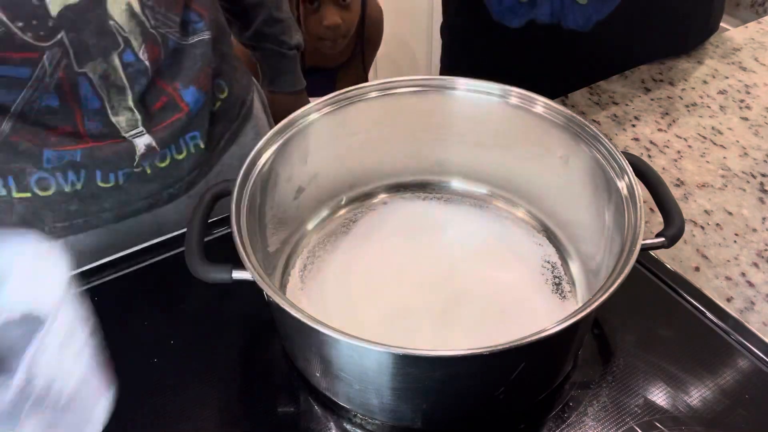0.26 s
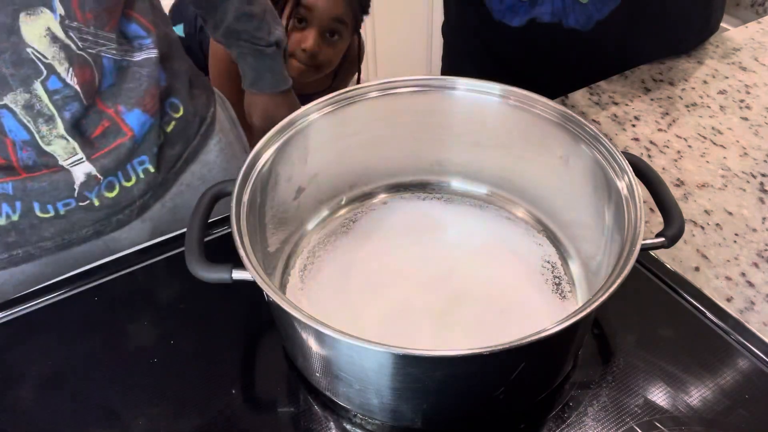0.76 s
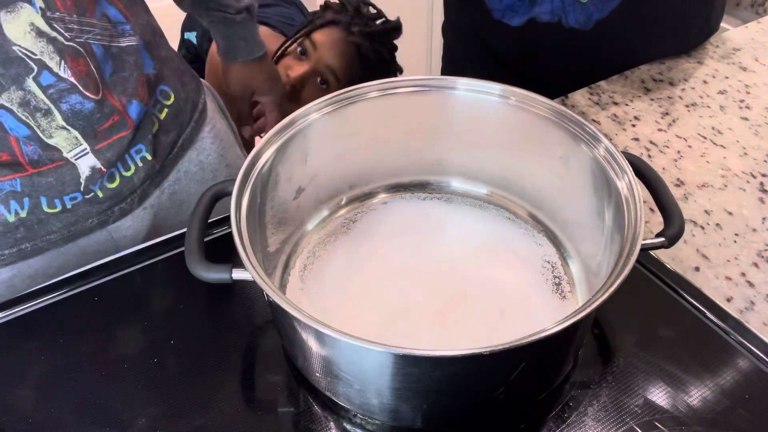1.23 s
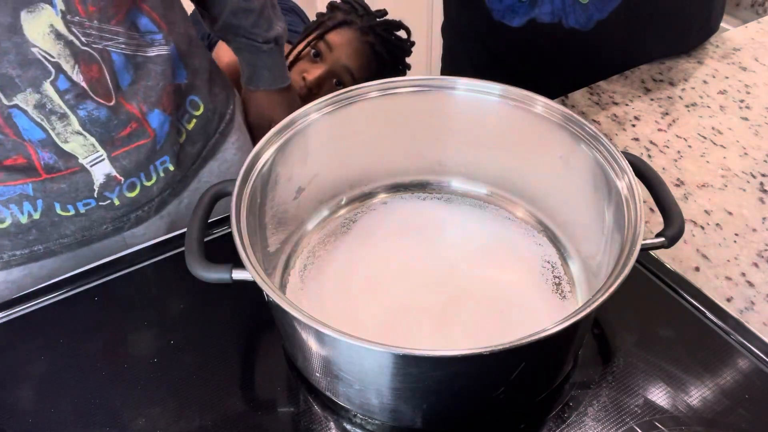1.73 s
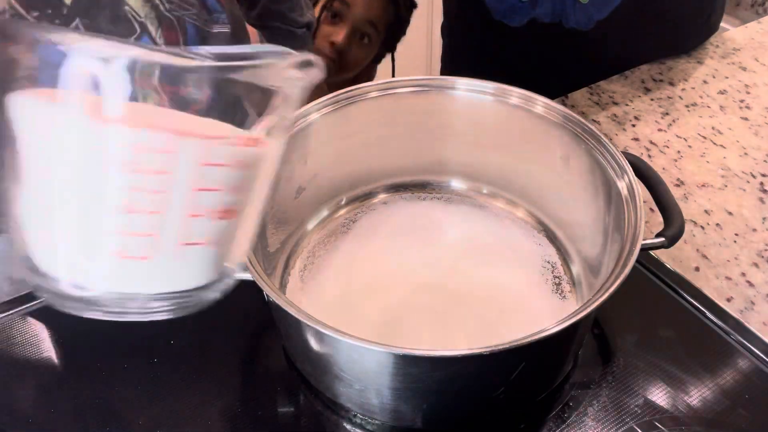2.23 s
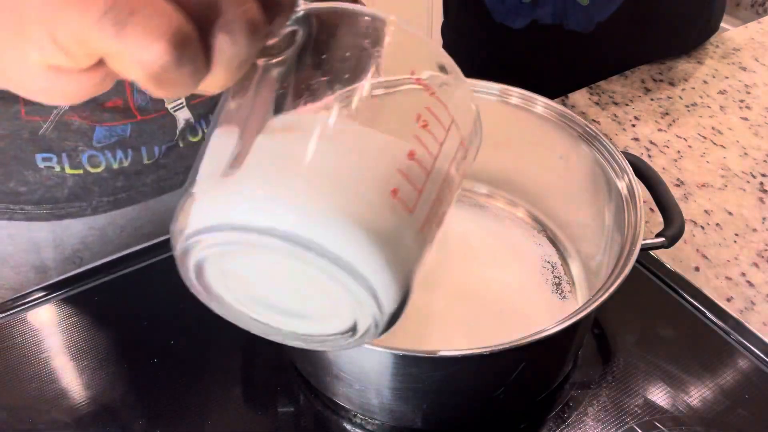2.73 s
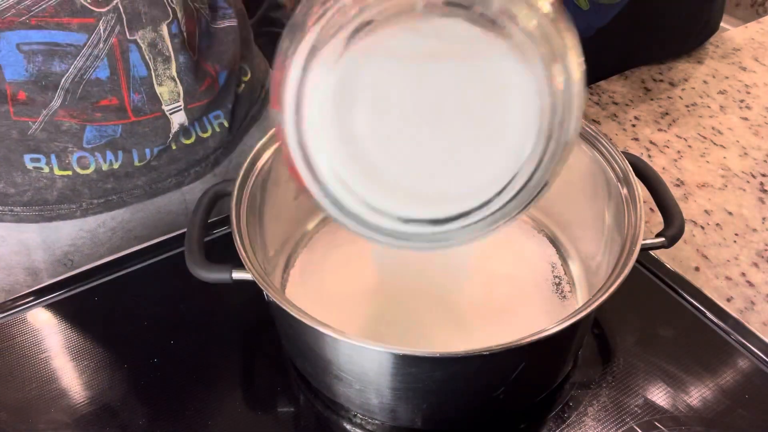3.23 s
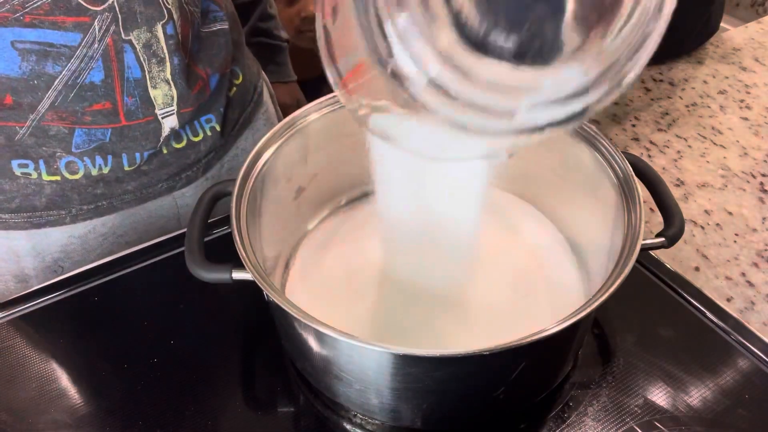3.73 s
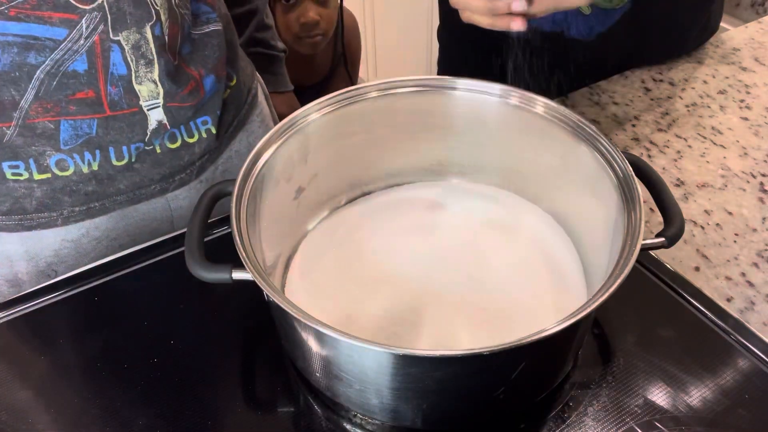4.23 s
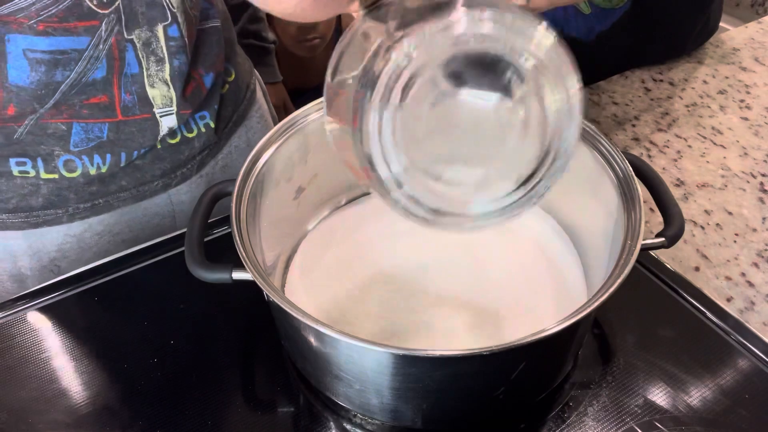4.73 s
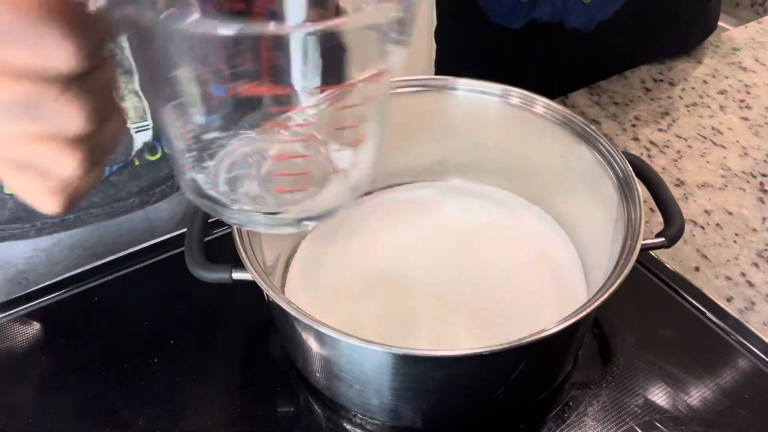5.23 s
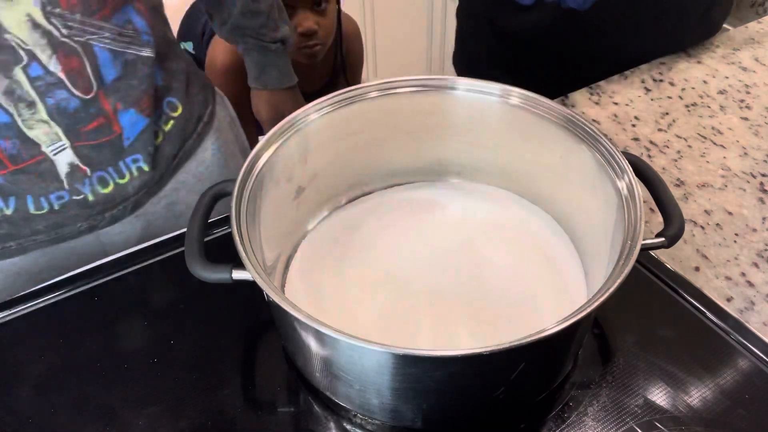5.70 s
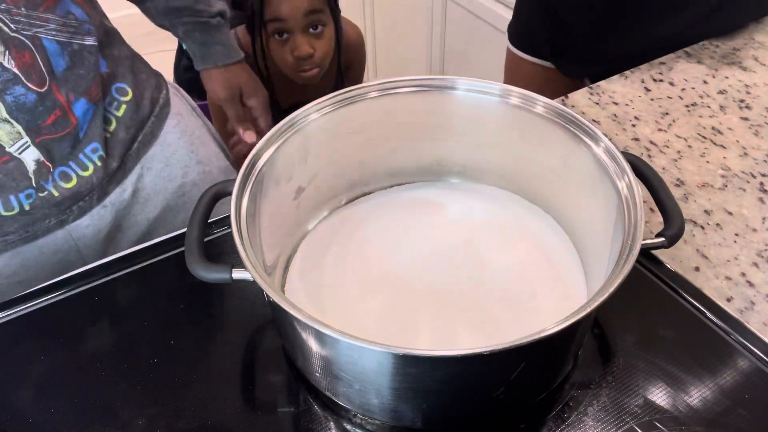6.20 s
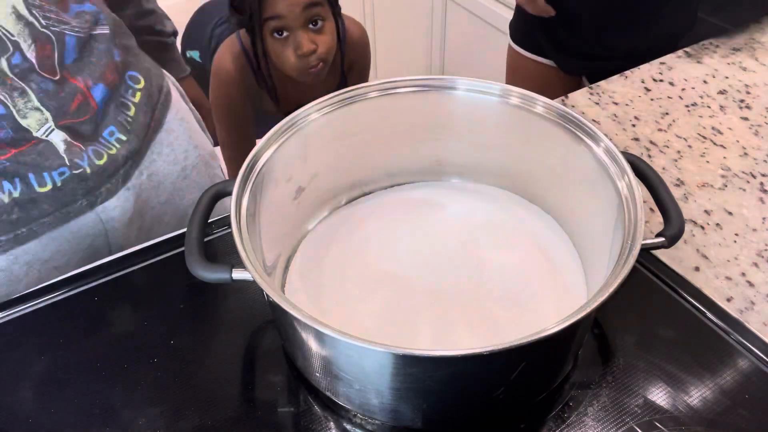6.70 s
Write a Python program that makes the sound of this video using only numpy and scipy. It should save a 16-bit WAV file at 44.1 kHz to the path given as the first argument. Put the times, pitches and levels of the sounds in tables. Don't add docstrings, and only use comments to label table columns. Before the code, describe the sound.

A plastic cup clacks down, sugar pours in a fine faint hiss, and finally a heavy glass jug clanks hard on a stone counter above fan hum.

```python
import sys
import numpy as np
from scipy import signal
from scipy.fft import rfft, irfft, next_fast_len
from scipy.io import wavfile
from scipy.ndimage import uniform_filter1d, minimum_filter1d

SR = 44100
rng = np.random.default_rng(int(sys.argv[2]) if len(sys.argv) > 2 else 0)


def master(y):
    cut = np.clip(np.atleast_2d(y).T, -1, 1)
    pcm = np.round(cut * 32767)
    wavfile.write(sys.argv[1], SR, pcm.astype(np.int16))


def convert_level_to_amplitude(level_db):
    exponent = np.asarray(level_db, float) / 20
    return 10 ** exponent


N = 306936
T = np.arange(N) / SR
HZ = np.fft.rfftfreq(N, 1 / SR) + 1e-3

# start in seconds, peak in dB, hardness in dB, counter thud in dB.
KNOCKS = [
    (6.279, -17, -33, -16.5),
    (6.2853, -13.5, -14, 5),
    (6.318, -32, -10, -26),
    (6.325, -10.5, -3, 2),
    (6.487, -26.5, -7, -30),
    (6.492, -16, -0.5, -4.5),
    (6.517, -22, 12.5, 5.5),
    (6.63, -35.5, -10, 0),
]
# frequency in Hz, lead of the left port in radians.
GLASS_MODES = [(3497, 0), (3507, .5), (3795, -.3), (4537, 2.6), (4547, 2.6), (5717, 1.5), (6745, 0),
               (8021, 0), (9238, 0), (9868, 0), (9930, 0), (10300, 0), (10420, 0), (10670, 0), (11720, 0),
               (11800, 0), (12020, 0), (12150, 0), (13420, 0), (14050, 0), (14590, 0)]
# level in the first knocks in dB, level in the last in dB, decay T60 in seconds.
GLASS_RING = [(-45, -37, 0.54), (-55, -47, 0.62), (-59, -41, 0.41), (-59, -29, 0.29), (-48, -41.5, 0.63),
              (-63, -59, 0.32), (-62, -47, .2), (-63, -52.5, 0.36), (-55, -66, 0.089), (-46.5, -41.5, 0.25),
              (-45, -62, 0.17), (-38.5, -46, 0.092), (-67, -62.5, .3), (-67, -60, 0.065),
              (-41, -44.5, 0.11), (-57, -61.5, 0.42), (-45, -52.5, 0.13), (-64, -62.5, 0.34),
              (-53, -62, 0.17), (-68, -57, 0.104), (-72, -57, .09)]


def rms_one(x):
    return x / np.sqrt(np.mean(x ** 2) + 1e-20)


def in_time(rows):
    s, *columns = np.transpose(rows)
    return [np.interp(T, s, c) for c in columns]


def in_pitch(rows):
    hz, *columns = np.transpose(rows)
    return [np.interp(np.log(HZ), np.log(hz), c) for c in columns]


def drift(rate):
    r = np.exp(-80 * np.pi * rate / SR)
    noise = rng.standard_normal(N // 40 + 2002)
    slow = signal.lfilter([1], [1, -2 * r, r * r], noise)[2000:]
    return np.interp(np.arange(N) / 40, np.arange(len(slow)), rms_one(slow))


def colour(x, gain):
    return irfft(rfft(x) * gain, N)


def ring(clicks, hz, t60):
    r, w = convert_level_to_amplitude(-60 / (t60 * SR)), 2 * np.pi * hz / SR
    return signal.lfilter([0, np.sin(w)], [1, -2 * r * np.cos(w), r * r], clicks + 1e-18)


def fading(times, gains, t60, rise_s):
    clicks = np.zeros(N)
    clicks[(np.asarray(times) * SR).astype(int)] = gains
    r, q = convert_level_to_amplitude(-60 / (t60 * SR)), np.exp(-1 / (rise_s * SR))
    return signal.lfilter([1 - q], np.convolve([1, -r], [1, -q]), clicks + 1e-18)


def at_ports(gain, alike, lead, tilt_db):
    shared, left, right = rfft(rng.standard_normal((3, N))) * gain
    alike = np.clip(alike, 0, 1)
    common, own = np.sqrt(alike) * shared, np.sqrt(1 - alike)
    left = (common + own * left) * convert_level_to_amplitude(tilt_db / 2)
    right = (common * np.exp(1j * lead) + own * right) * convert_level_to_amplitude(-tilt_db / 2)
    return rms_one(irfft(np.array([left, right]), N))


def apart(modes, lag_s):
    return np.minimum(2 * np.pi * lag_s * np.array(modes)[:, 0], 3.0)


def struck(times, levels_db, modes, leads, spread_db, rise_s, pan_db):
    out, first = np.zeros((2, N)), int(times[0] * SR) - 100
    length = min(SR, N - first)
    at = (np.asarray(times) * SR).astype(int) - first
    chance = rng.standard_normal((len(times), len(modes)))
    levels_db = np.broadcast_to(levels_db.reshape(len(times), -1), chance.shape)
    q = np.exp(-1 / (rise_s * SR))
    for k, ((hz, level_db, t60), lead) in enumerate(zip(modes, leads)):
        clicks, spin = np.zeros(length, complex), np.exp(2j * np.pi * hz / SR)
        clicks[at] = convert_level_to_amplitude(levels_db[:, k] + level_db + spread_db * chance[:, k]) * (-1) ** k
        poles = np.convolve([1, -convert_level_to_amplitude(-60 / (t60 * SR)) * spin], [1, -q * spin])
        swing = signal.lfilter([1 - q], poles, clicks + 1e-18)
        out[:, first:first + length] += np.imag(swing * [[convert_level_to_amplitude(pan_db)], [np.exp(-1j * lead)]])
    return out


def crack(times, levels_db, bright_db, spectrum, t60, rise_s, lag_s, alike, pan_db, high_share=0.29):
    gain = convert_level_to_amplitude(in_pitch(spectrum)[0]) / (1 + (70 / HZ) ** 4)
    bright = np.clip((HZ - 3800) / 2500, 0, 1)
    likeness = alike + (1 - alike) / (1 + (HZ / 300) ** 2)
    noise = at_ports(gain, likeness, -2 * np.pi * HZ * lag_s, pan_db)
    highs = colour(noise, bright)
    lows = (noise - highs) * fading(times, convert_level_to_amplitude(levels_db), t60, rise_s)
    return lows + highs * fading(times, convert_level_to_amplitude(levels_db + bright_db), t60 * high_share, rise_s * 0.31)


def jug():
    # drive of the low glass modes, of the high ones and of the steel trivet, all in dB.
    drive = [
        (-24, -44, -40),
        (-25, -2, -9),
        (-32, -30, -42),
        (0, 0.5, -12),
        (-30, -22, -24),
        (-3, 2.5, -3),
        (2.5, -3.5, -19),
        (-21, -26, -16),
    ]
    # frequency in Hz, level in dB, decay T60 in seconds.
    trivet_modes = [(753, -25, 0.3), (878, -38, 0.38), (1200, -33, .3), (1405, -28.5, 0.63),
                    (1860, -33, .3), (2120, -26, 0.29), (2640, -45, .4), (2930, -46, .4)]
    # frequency in Hz, level in dB, decay T60 in seconds.
    counter_modes = [(102, -15.5, 0.15), (147, -8.5, 0.12), (229, -7.5, 0.02), (396, -1, 0.027),
                     (670, -8.5, 0.02), (720, -2, 0.048), (786, -2.5, 0.055), (915, -14, 0.071),
                     (1060, -2, 0.053), (1196, -6.5, 0.061), (1355, -3, 0.052), (1448, -4.5, 0.11),
                     (1520, -21, 0.1), (1900, -9, 0.051), (1935, -1, 0.065), (2270, -10.5, 0.1),
                     (2540, -3, 0.022), (3230, -8.5, 0.032), (3564, -11.5, 0.04), (4450, -13, 0.043)]
    # frequency in Hz, density in dB per Hz.
    contact_spectrum = [(35, -50), (60, -17), (160, -4.5), (566, -12), (732, 0.5), (862, -4), (3580, -12.5),
                        (6140, -28.5), (6700, -23), (7230, -84), (10000, -27), (13900, -74), (16000, -63)]
    # frequency in Hz, density in dB per Hz.
    rattle_spectrum = [(60, -27), (160, -10), (566, -9.5), (732, -0.5), (900, -5), (3580, -12.5),
                       (5000, -30), (6800, -29.5), (7100, -70), (16000, -83)]
    s, peak_db, hard_db, thud_db = np.transpose(KNOCKS)
    low_db, high_db, steel_db = np.transpose(drive)
    hz, leads = np.transpose(GLASS_MODES)
    first_db, last_db, t60 = np.transpose(GLASS_RING)
    blows_db = np.where(s[:, None] < 6.4, first_db, last_db)
    blows_db = blows_db + np.where(hz < 7500, low_db[:, None], high_db[:, None])
    glass = struck(s, blows_db, np.transpose([hz, 0 * hz, t60]), leads, spread_db=1.0, rise_s=0.0019, pan_db=3.0)
    glass *= convert_level_to_amplitude(1.9 * np.sin(2 * np.pi * 23 * T))
    trivet = struck(s, steel_db, trivet_modes, apart(trivet_modes, 0.00032),
                    spread_db=1.0, rise_s=0.0026, pan_db=4.0)
    trivet = trivet * convert_level_to_amplitude(2.2 * drift(19))
    counter = struck(s, peak_db + thud_db - 6.5, counter_modes, apart(counter_modes, 0.00044),
                     spread_db=3.0, rise_s=0.00099, pan_db=7.5)
    contact = crack(s, peak_db, hard_db - 3, contact_spectrum, 0.071,
                    rise_s=0.0018, lag_s=0.00037, alike=0.27, pan_db=-3.0)
    rattle = crack(s, peak_db - 25.5, -2.5, rattle_spectrum, 0.79,
                   rise_s=0.0022, lag_s=0.000526, alike=0.21, pan_db=-1.5, high_share=0.79)
    patchy = convert_level_to_amplitude(2.0 * drift(26))
    return glass + trivet + counter + contact + rattle * patchy


def sugar():
    # frequency in Hz, density in dB per Hz.
    grain_spectrum = [(2500, -30), (4000, -12), (6400, -5.5), (7100, 0.5), (8000, 1.5), (9300, -9.5),
                      (10400, -3), (12000, -6.5), (14600, -5), (15600, -2)]
    # time in seconds, hiss in dB.
    flow = [
        (2.72, -104),
        (2.8, -89),
        (3.3, -82.5),
        (3.42, -79),
        (3.61, -76.5),
        (3.95, -80.5),
        (4.1, -80),
        (4.26, -88),
        (4.33, -104),
    ]
    # peak time in seconds, peak in dB, swell and fade in seconds, over 30 dB.
    rustles = [(.05, -90.5, 0.35, .9), (.40, -72, 0.19, 0.65), (.52, -77.5, 0.37, 0.61),
               (.72, -84, 0.37, 0.44), (2.55, -93, .6, .7), (4.5, -97, .5, 2.5), (5.4, -91, .6, 0.71),
               (5.55, -83, .7, 0.54), (5.87, -74.5, 0.15, 0.24), (6.1, -75.5, .45, 0.62),
               (6.45, -86, 0.4, .9), (6.78, -80.5, 0.8, 0.63)]
    sizes = convert_level_to_amplitude(3.0 * np.minimum(rng.exponential(1, N), 5)) * rng.choice([-1, 1], N)
    grains_per_s = 9000 * convert_level_to_amplitude(1.2 * drift(15))
    grains = sizes * (rng.random(N) < grains_per_s / SR)
    hiss = rms_one(colour(grains, convert_level_to_amplitude(in_pitch(grain_spectrum)[0])))
    high_modes = zip(GLASS_MODES[9:18], GLASS_RING[9:18])
    glass = rms_one(sum(convert_level_to_amplitude(db) * ring(grains, hz, t60=0.1) for (hz, _), (_, db, _) in high_modes))
    flow_db, = in_time(flow)
    lip = convert_level_to_amplitude(flow_db - 14 + 1.1 * (flow_db - flow_db.max())) * glass
    cloth = sum(convert_level_to_amplitude(db - 29.4 * np.maximum((s - T) / swell, (T - s) / fade)) ** 2
                for s, db, swell, fade in rustles)
    level = np.sqrt(convert_level_to_amplitude(flow_db) ** 2 + cloth)
    top = colour(hiss, np.clip((HZ - 12970) / 1200, 0, 1))
    hiss = hiss - top / (1 + (level / convert_level_to_amplitude(-93)) ** 2)
    return convert_level_to_amplitude(8.0 + ducking_db()) * (level * hiss + lip) * np.ones((2, 1))


def cup():
    # start in seconds, peak in dB, thump in dB, brightness in dB.
    bounces = [
        (0.541, -38, -33, -17.5),
        (0.5495, -16, -1, 9),
        (0.563, -26.5, -2, -5),
        (0.622, -29.5, -5, 2.5),
        (0.68, -27, -3, -1),
    ]
    # frequency in Hz, level in dB, decay T60 in seconds.
    plastic_modes = [(168.8, 1, 0.16), (297, -6.5, 0.12), (731, -8, 0.18), (842.5, -5.5, .1),
                     (922, -5, 0.2), (1101, -9, 0.093), (1610, -9.5, 0.144), (1860, -19.5, 0.105),
                     (2360, -20, 0.14), (3230, -17.5, 0.14), (3290, -27.5, 0.4), (3400, -7.5, .065),
                     (4670, -29, 0.065), (6000, -22, 0.049)]
    # frequency in Hz, density in dB per Hz.
    contact_spectrum = [(59, -35), (100, -10), (266, -4.5), (492, -7.5), (910, -1.5), (1870, -16.5),
                        (5770, -27.5), (6990, -26), (11900, -34.5), (16000, -43.5)]
    s, peak_db, thump_db, bright_db = np.transpose(bounces)
    thump = struck(s, peak_db + thump_db - 9.5, plastic_modes[:2], [.2, .4],
                   spread_db=4.5, rise_s=0.0005, pan_db=1.5)
    wall_modes = plastic_modes[2:]
    wall_db = peak_db - 14.0 - 4.5 * (s > .6)
    wall = struck(s, wall_db, wall_modes, apart(wall_modes, .00005), spread_db=5.5, rise_s=.0007, pan_db=1.2)
    contact = crack(s, peak_db - 5.5, bright_db + 6.5, contact_spectrum, 0.047,
                    rise_s=0.00097, lag_s=0, alike=0.38, pan_db=4.0)
    rattle = crack(s, peak_db - 28.0, bright_db + 5.0, contact_spectrum, 0.48,
                   rise_s=0.003, lag_s=0, alike=0.9, pan_db=2.0)
    return thump + wall + contact + rattle


def ticks():
    # start in seconds, level in dB, body frequency in Hz.
    snaps = [(.045, -74, 8400), (1.131, -68, 8040), (1.22, -74, 9020), (1.24, -77, 11000),
             (1.36, -80, 11000), (1.40, -77, 11100), (1.664, -68, 11530), (1.976, -70.5, 14020),
             (2.188, -67.5, 7000), (2.21, -73.5, 11000), (2.24, -79, 11000), (4.27, -67.5, 9920),
             (5.06, -69.5, 12040), (5.47, -67.5, 11600), (5.911, -66, 14800), (6.23, -62, 11320)]
    # start in seconds, body in dB, body frequency in Hz,
    taps = [(.171, -70, 4530, -21), (.321, -55, 5870, -7), (.6215, -39.5, 1490, -33),
            (.623, -49, 1930, -29), (0.683, -38, 1880, -30), (1.5808, -51.5, 2930, -23),
            (1.583, -54, 7030, -13), (1.581, -59, 4900, -11), (2.088, -44.5, 2740, -21.5),
            (2.089, -49.5, 1820, -22), (2.12, -51.5, 1280, -23), (2.13, -54, 2720, -6),
            (4.043, -58.5, 3060, -15.5), (4.704, -47.5, 1440, -39.5), (4.711, -48, 2260, -50),
            (5.79, -58, 5450, 5.5), (5.805, -42, 2950, -6.5), (5.807, -47.5, 6960, -29),
            (5.848, -51.5, 4700, -6.5), (6.456, -46, 2980, -30.5), (6.79, -55, 4770, -2.5),
            (6.952, -65, 4600, -8)]
    rows = [(s, db, hz, db - 1, 0.05) for s, db, hz in snaps]
    rows += [(s, db + snap_db, hz, db, 0.057) for s, db, hz, snap_db in taps]
    rows = sorted(rows)
    out, noise = np.zeros((2, N)), rng.standard_normal((len(rows), 2, 2, 8000))
    snap = signal.butter(2, [4500, 14500], "band", fs=SR, output="sos")
    for (s, bright_db, hz, body_db, t60), puff in zip(rows, noise):
        body = signal.butter(1, hz * np.array([.9, 1.11]), "band", fs=SR, output="sos")
        sound = convert_level_to_amplitude(bright_db) * rms_one(signal.sosfilt(snap, puff[0]))
        sound += convert_level_to_amplitude(body_db) * rms_one(signal.sosfilt(np.vstack([body, body]), puff[1]))
        shape = convert_level_to_amplitude(-1.5 - 60 * T[:8000] / t60) * (1 - np.exp(-T[:8000] / (0.014 * t60)))
        i = int(s * SR)
        out[:, i:i + 8000] += (sound * shape)[:, :N - i]
    return out


def squeaks():
    # start in seconds, length in seconds, frequency in Hz, level in dB.
    handle = [
        (2.015, .07, 3710, -77),
        (2.25, .2, 3640, -77),
        (2.27, .08, 3250, -79),
        (2.47, .07, 3440, -79),
        (2.76, .1, 2700, -73),
        (3.12, .12, 4000, -80),
        (3.17, .1, 4400, -80),
    ]
    out = np.zeros(N)
    for s, length, hz, db in handle:
        shape = np.sin(np.pi * np.clip((T - s) / length, 0, 1)) ** 0.53
        level = convert_level_to_amplitude(db + 3.9 * drift(30) - 1.5)
        out += shape * level * np.sin(2 * np.pi * np.cumsum(hz + 25 * drift(19.0)) / SR)
    return out * np.ones((2, 1))


def shelf():
    # frequency in Hz, level in dB, decay T60 in seconds.
    shelf_modes = [(179, 4, 0.034), (753, 0.5, 0.1), (804, -4.5, 0.098), (906.6, -2.5, 0.39),
                   (920, -5, 0.25), (1055, -2, 0.16), (1220, -17, 0.17), (1360, -3.5, 0.21),
                   (1360, -16, 0.44), (1460, -8, 0.17), (1650, -22, 0.11), (2110, -8, 0.23),
                   (2400, -19, 0.32), (3070, -15, 0.25)]
    s, peak_db, _, thud_db = np.transpose(KNOCKS)
    push = at_ports(1, 0.95, 2 * np.pi * HZ * -.0004, 3.6)
    push = push * fading(s, convert_level_to_amplitude(peak_db + thud_db - 26.5), t60=0.025, rise_s=0.0087)
    first, out = int(s[0] * SR) - 100, np.zeros((2, N))
    out[:, first:] = sum(convert_level_to_amplitude(db) * ring(push[:, first:], hz, t60) for hz, db, t60 in shelf_modes)
    return out


def fan():
    # time in seconds, rumble in dB.
    effort = [(0, -49.5), (.4, -46.5), (1.1, -48.5), (2.0, -47), (2.73, -47.5), (2.95, -43.5), (3.2, -43),
              (3.8, -42), (4.8, -39.5), (6.2, -36.5), (6.96, -37.5)]
    # time in seconds, frequency in Hz, level in dB.
    blade_course = [(0.0, 471, -53.5), (0.04, 465.6, -58), (1.65, 472.5, -58), (2.17, 483, -61.5),
                    (3.18, 486, -55), (4.05, 499, -57.5), (6.96, 505.9, -48)]
    # frequency in Hz, density in dB per Hz.
    rumble_spectrum = [(15, -47), (25, -39), (40, -17.5), (76, -15.5), (156, -2), (248, -3), (295, -9),
                       (367, -1.5), (456, -24.5), (508, -25), (529, -29.5), (590, -20), (640, -36.5),
                       (830, -74.5), (1410, -120)]
    # frequency in Hz, density in dB per Hz.
    air_spectrum = [(290, -15), (500, -9.5), (653, -19.5), (805, -10.5), (1390, -31.5), (1490, -27.5),
                    (2130, -20.5), (2920, -31.5), (5330, -41), (8000, -51.5), (10400, -96), (17600, -120)]
    # frequency in Hz, width in Hz, level in dB.
    casing_modes = [(732, 51, 2), (1176, 110, -2.5), (1516, 82, -0.5), (2157, 80, 0), (2515, 100, -7.5),
                    (2720, 33, -21.5), (3440, 76, -10.5), (3860, 40, -15), (4460, 46, -18),
                    (5260, 130, -29)]
    # frequency in Hz, likeness 0-1, lead of the right in radians,
    # left minus right in dB.
    port_field = [(50, .95, .4, .6), (170, .93, .8, .2), (350, .86, 1.2, -.5), (480, .8, 1.9, .4),
                  (750, .63, 2.9, -7), (960, .5, 1.8, -3), (1270, .45, 1.4, -1.2), (1700, .45, 4.1, .7),
                  (2200, .6, 5.3, 1.2), (2750, .35, 6.8, 0), (3700, .15, 9.9, 0), (6000, .05, 16, 0)]
    pressed_db = ducking_db()
    rumble_db = in_time(effort)[0] + pressed_db
    air_db = rumble_db.mean() - 19 + 1.015 * (rumble_db - rumble_db.mean())
    ports = in_pitch(port_field)
    rumble = at_ports(convert_level_to_amplitude(in_pitch(rumble_spectrum)[0]), *ports) * convert_level_to_amplitude(rumble_db + 1.0 * drift(15.6) + 1.0)
    air = at_ports(convert_level_to_amplitude(in_pitch(air_spectrum)[0]), *ports) * convert_level_to_amplitude(air_db + 0.7 * drift(15) + 3.5)
    peaks = sum(convert_level_to_amplitude(db) / np.abs(1 + 2j * (HZ - hz) / width) ** 2 for hz, width, db in casing_modes)
    casing = at_ports(peaks, *ports) * convert_level_to_amplitude(air_db + 2.5 * drift(30) - 3.5)
    blade_hz, blade_db = in_time(blade_course)
    turn = 2 * np.pi * np.cumsum(blade_hz + 2.41 * drift(5)) / SR
    blade_level = np.sqrt(2) * convert_level_to_amplitude(blade_db + pressed_db + 1.0 * drift(12) + 5.0)
    blade = blade_level * np.sin(turn + np.array([[0], [2.3]]))
    return rumble + air + casing + blade


def kitchen(x):
    size = next_fast_len(N + SR)
    hz = np.fft.rfftfreq(size, 1 / SR)
    t60 = 0.22 / np.sqrt(1 + (hz / 5300) ** 2)
    out = np.zeros((2, len(hz)), complex)
    for k, lag in enumerate(rng.uniform(0.011, .035, 16)):
        echo = convert_level_to_amplitude(-60 * lag / t60) * np.exp(-2j * np.pi * hz * lag)
        out[k % 2] += echo / (1 - echo) * (-1) ** (k // 2)
    return irfft(out * rfft(x.mean(0), size), size)[:, :N]


def ducking_db():
    s, peak_db = np.transpose(KNOCKS)[:2]
    depth_db = 1.6 * np.maximum(peak_db + 17.5, 0)
    return -fading(s, depth_db, t60=0.67, rise_s=0.012)


def scene():
    cup_down, jug_down, small = cup(), jug(), ticks()
    room = kitchen(convert_level_to_amplitude(-19.5) * cup_down + convert_level_to_amplitude(-22.0) * jug_down + convert_level_to_amplitude(-14.0) * small)
    return jug_down + sugar() + cup_down + small + squeaks() + shelf() + fan() + room


def low_pass(x):
    return signal.sosfilt(signal.butter(12, 16470, fs=SR, output="sos"), x)


def record(dry):
    # frequency in Hz, density in dB per Hz.
    self_noise = [(3000, -28.5), (6000, -8), (9000, -2), (12000, -10.5), (12600, -13.5), (13600, -23),
                  (15000, -30.5)]
    # frequency in Hz, lead of the right channel in radians.
    high_turn = [(6500, 3.4), (7300, 3.0), (8400, 2.3), (10500, .7), (12500, 0), (14500, -1.2),
                 (16000, -2.4)]
    hiss = convert_level_to_amplitude(-101) * at_ports(convert_level_to_amplitude(in_pitch(self_noise)[0]), 1.0, 0, 0)
    level = dry - np.linspace(0, 1, N) * (dry[:, -1:] - dry[:, :1])
    spectrum, turn = rfft(level + hiss), in_pitch(high_turn)[0]
    high = np.clip((HZ - 5800) / 1500, 0, 1)
    shared = spectrum[0] * np.exp(.5j * turn * np.array([[-1], [1]]))
    band = (HZ < 15750) / np.sqrt(1 + (40 / HZ) ** 6)
    x = irfft((spectrum * np.sqrt(1 - high) + shared * np.sqrt(high) * 0.99) * band, N)
    ceiling, reach = .9, 221
    headroom = minimum_filter1d(ceiling / np.maximum(np.abs(x).max(0), ceiling), reach)
    limiter = uniform_filter1d(uniform_filter1d(headroom, reach // 2), reach // 2)
    return low_pass(x * limiter)


dry = scene()
out = record(dry)
master(out)
```